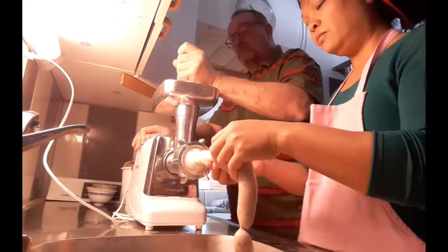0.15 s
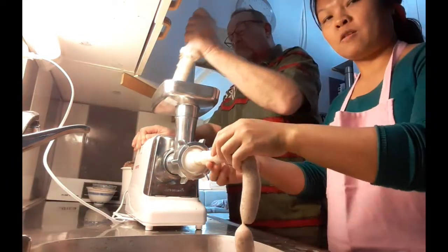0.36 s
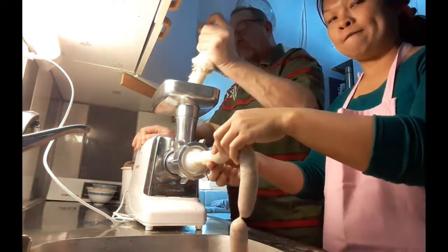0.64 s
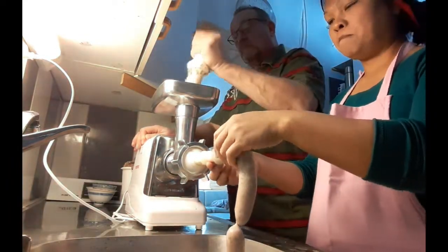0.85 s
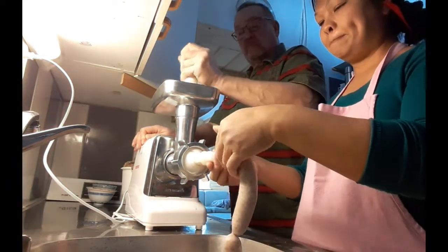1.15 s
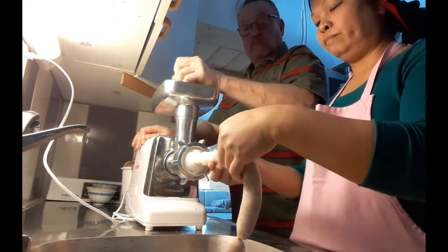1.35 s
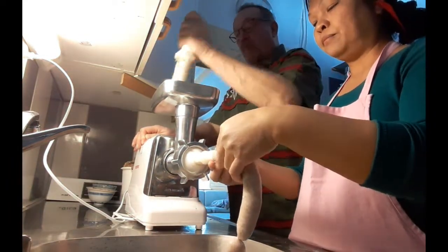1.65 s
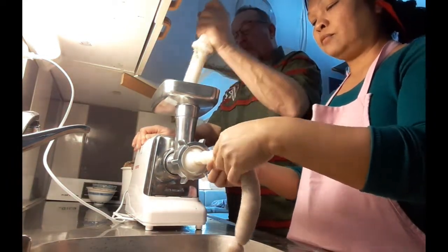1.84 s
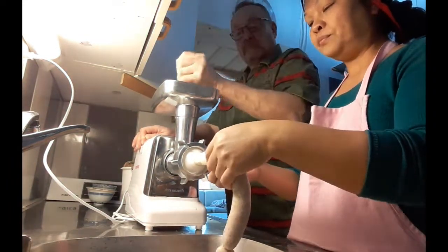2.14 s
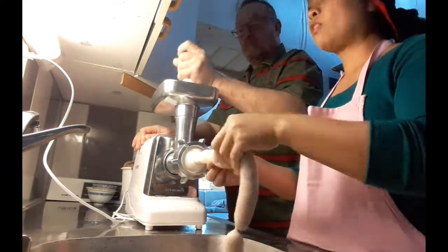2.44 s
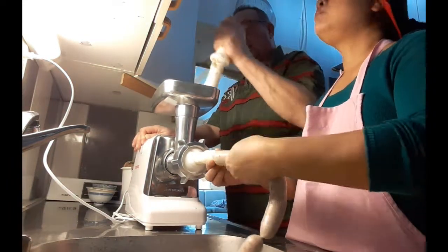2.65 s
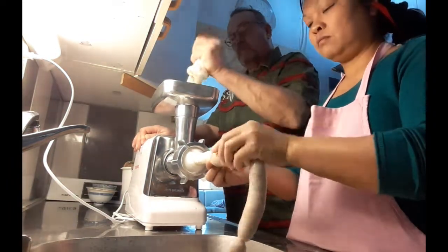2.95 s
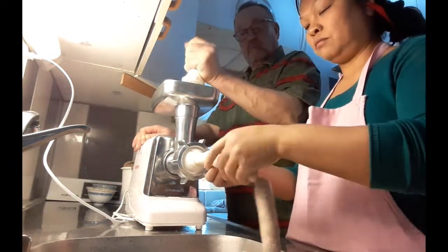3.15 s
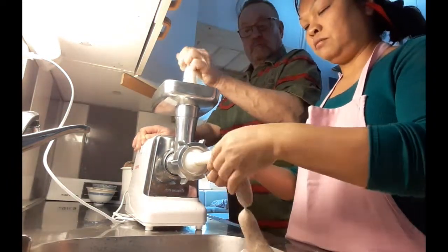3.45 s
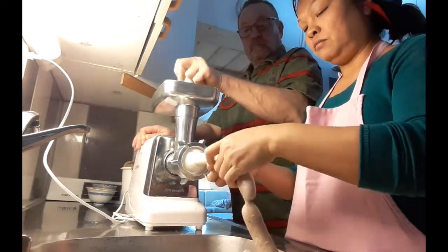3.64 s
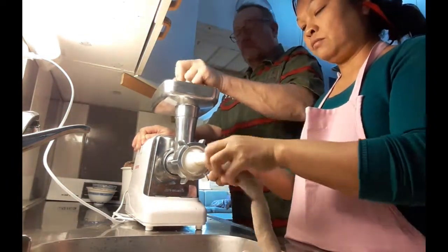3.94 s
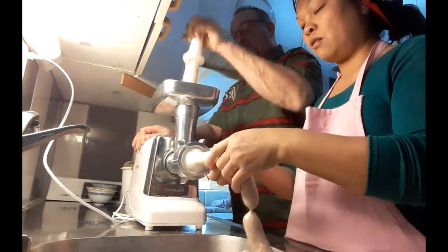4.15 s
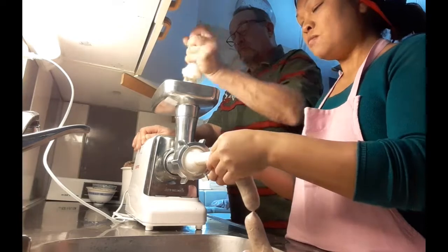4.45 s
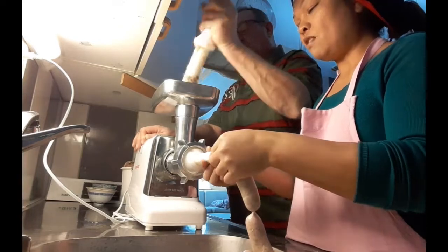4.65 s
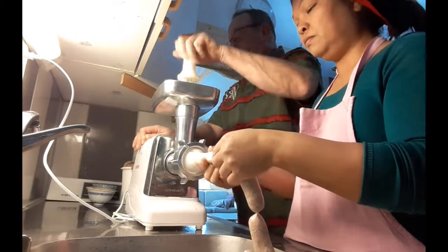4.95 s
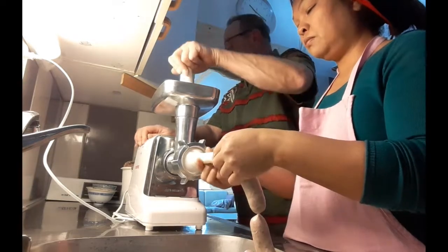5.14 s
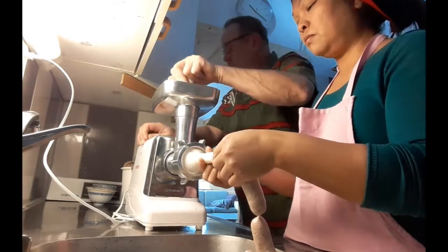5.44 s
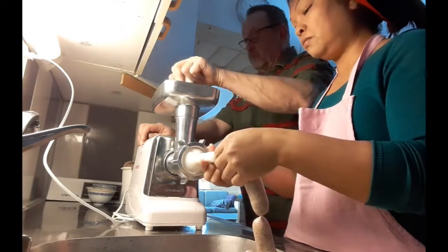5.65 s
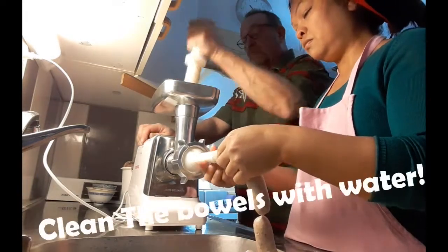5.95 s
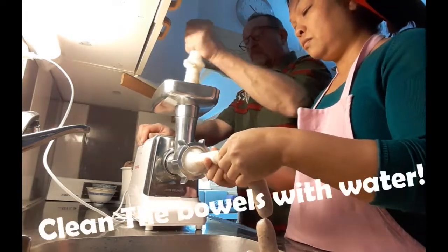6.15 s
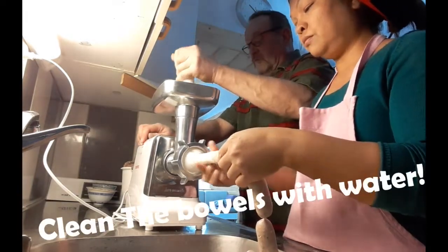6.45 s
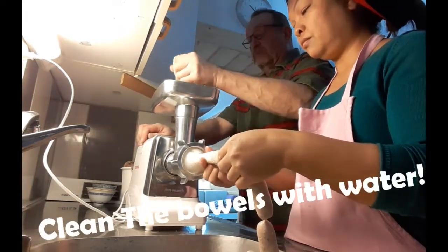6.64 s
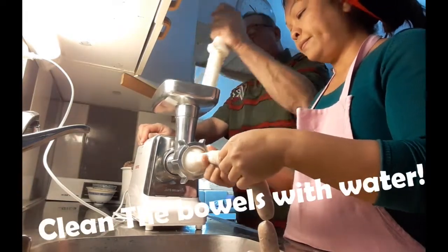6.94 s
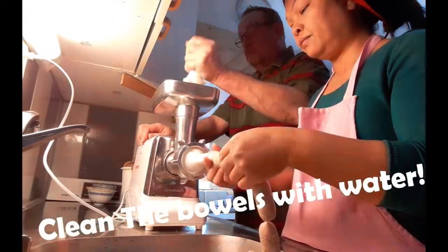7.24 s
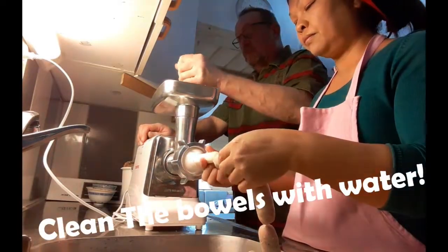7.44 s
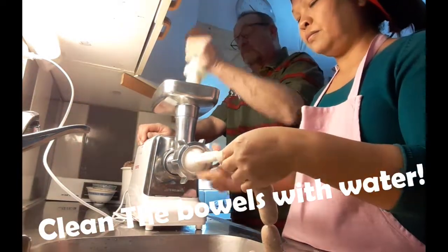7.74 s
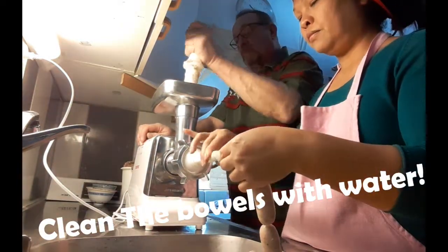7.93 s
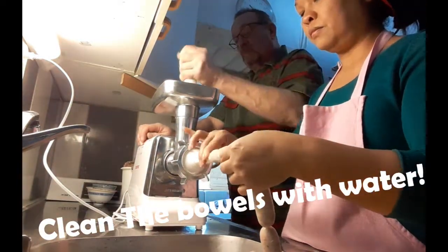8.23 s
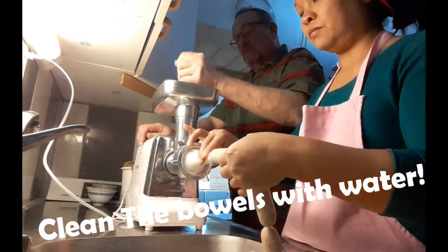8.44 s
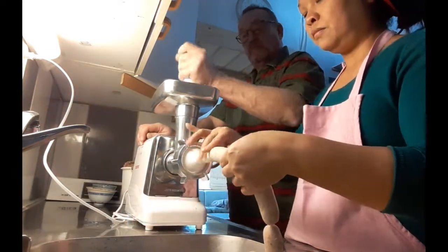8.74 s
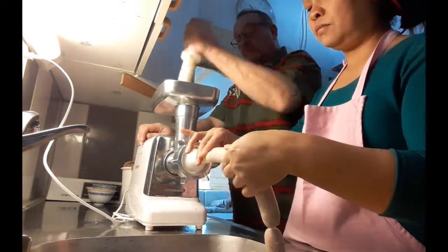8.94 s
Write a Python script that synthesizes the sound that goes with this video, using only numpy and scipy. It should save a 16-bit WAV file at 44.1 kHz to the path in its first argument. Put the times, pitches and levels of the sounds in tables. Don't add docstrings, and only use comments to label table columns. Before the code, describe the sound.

Steady mechanical whirring from a countertop mincer: stacked gear and motor tones, a rough housing rattle, mains buzz and broad hiss. Two small tray taps come early, then dull plunger bumps now and then. A lower singing whine fades midway; later the motor speeds up a hair. Close small microphone, little deep bass, hard kitchen surfaces, no start or stop.

```python
import sys
import numpy as np
from scipy import signal
from scipy.fft import rfft, irfft
from scipy.io import wavfile
from scipy.ndimage import map_coordinates

SR = 44100
rng = np.random.default_rng(int(sys.argv[2]) if len(sys.argv) > 2 else 0)


def materialize(psi):
    bounded = np.clip(np.atleast_2d(psi).T, -1, 1)
    quanta = np.round(bounded * 32767).astype(np.int16)
    wavfile.write(sys.argv[1], SR, quanta)


def linear_from_db(decibels):
    return 10 ** (np.asarray(decibels, float) / 20)


N = 400868

LAY_RATIO, MIDDLE_RATIO = 12.235, 3.5
PRESS_RELEASE_S = 0.14


def whines(turns, change_db):
    wobbles = [(12.235, .2, -.25), (6.1175, .08, -.19), (22.72, .17, .03), (26.4, .12, .04)]
    mesh_orders = [4.25, 8.5, 17, 21.25, 25.5, 34, 6.72, 13.44, 20.16, 40.32, 47, 5.43, 7.5, 9.38, 14.72,
                   24.4, 44.3, 49.7, 57.8]
    # rms level in dB, throb depth 0-1, throb phase in lay shaft turns.
    mesh = [(-77, 0.17, -0.13), (-63, 0.26, -0.53), (-55.5, 0.32, -.49), (-73, .3, .39), (-68.5, 0.5, 0.49),
            (-65, 0.15, .53), (-56, 0.22, -0.099), (-68, 0, 0), (-67.5, .2, -0.29), (-78.5, 0.6, -0.32),
            (-65, .14, -0.18), (-90, .1, .4), (-73.5, 0, 0.29), (-81.5, 0.3, 0.4), (-67, 0, .45),
            (-74, 0.2, .45), (-78, 0, .45), (-71, .3, 0.6), (-77.5, .2, .45)]
    rotor_orders = [6, 7, 8, 11, 12, 14, 15, 16, 18, 19, 23, 31, 32, 33, 35, 38, 39, 43, 46, 54, 55, 59, 62,
                    67, 75, 83, 94, 24, 28]
    # rms level in dB, throb depth 0-1, throb phase in lay shaft turns.
    rotor = [(-83, 0.1, 0.43), (-72, 0.14, -.23), (-59.5, 0.17, -0.055), (-83, .5, 0.39), (-76, 0.4, 0.23),
             (-71, 0, 0.46), (-59, 0, -.36), (-69.5, 0, .45), (-73, .26, 0.36), (-84.5, 0.3, .61),
             (-75.5, 0, -.44), (-66.5, 0.27, 0.37), (-73.5, 0, -.49), (-80.5, 0.7, -0.44),
             (-75, 0.5, -0.051), (-75.5, 0.06, -.42), (-68.5, .07, -0.0093), (-68.5, .2, .2),
             (-71, .14, .53), (-71, .05, 0.32), (-68.5, 0.1, 0.33), (-70.5, .06, -.02), (-72, .2, 0.018),
             (-70.5, 0.3, -.02), (-81.5, .3, 0.56), (-74.5, .07, .48), (-78, 1, .43), (-79.5, 0, 0.5),
             (-75.5, .2, 0.57)]

    lay = turns / LAY_RATIO
    swing = sum(share / 100 * ratio * np.sin(2 * np.pi * (turns / ratio + turn))
                for ratio, share, turn in wobbles)
    angle = turns + swing / (2 * np.pi) + 0.0028 * walk(18) + 0.0048 * walk(4)
    backlash = 0.24 * np.sin(2 * np.pi * (lay - 0.25))
    flutter = [walk(20) for _ in range(6)]
    slip = [0.18 * walk(9) for _ in range(5)]
    drift_db = 0.75 * walk(1.424)
    out = np.zeros(N)
    for k, (order, (db, depth, turn)) in enumerate(zip(mesh_orders + rotor_orders, mesh + rotor)):
        slow_db = change_db[order] if order in change_db else np.roll(drift_db, k * 30011)
        flutter_db = (0.45 + 0.025 * order) * flutter[k % 6]
        phase = 2 * np.pi * (order * angle + rng.random()) + slip[k % 5] + backlash * (order < 8.2)
        out += linear_from_db(db + slow_db + flutter_db) * throb(lay, depth, turn) * np.sin(phase)
    return np.sqrt(2) * out * throb(turns / MIDDLE_RATIO, 0.055, 0.22)


def responses(t, speed):
    # time in seconds, seating from -1 loose to 1 tight.
    seating = [(0, 0.68), (.2, 0.28), (.45, 0.2), (1, 0.63), (1.45, 0.88), (1.7, .1), (2.2, .75),
               (2.65, -0.18), (3.2, 0.66), (3.9, .55), (4.2, -0.58), (4.5, 0), (5.6, -.9), (6, 0.24),
               (6.4, -1), (7.3, 0.48), (7.9, 0.08), (8.4, -0.48)]
    led = (6.72, 15, 17, 25.5, 34, 47, 8, 8.5, 31, 46, 20.16, 33)
    # dB per turn/s of speed, dB per unit seating, offset in dB, wander in dB.
    answer = [(2.5, 0.5, -1.2, .8), (2.5, -1, -0.5, 1), (-2, -0.5, 0.73, 0.65), (-0.5, 1.7, -1.2, 2.7),
              (2, 3.5, -1, 1.5), (-0.5, 9.5, 0.5, .7), (-1, 0.2, 0, 0.7), (-2.5, 0.5, -0.8, 0.8),
              (-2, -1.1, 0, 1.1), (-5.5, 4, -1, 1.9), (2, 0, 0, 1.2), (4, -1.5, -1.5, 0.5)]

    seat = np.interp(t, *np.transpose(seating))
    usual_speed = 113
    out = {}
    for order, (per_speed, per_seat, offset_db, wander_db) in zip(led, answer):
        out[order] = per_speed * (speed - usual_speed) + per_seat * seat + offset_db + wander_db * walk(4)

    tray_order, damped_db = 4.25, -16
    free = ramp(t, 0.21, 0.25) * (1 - ramp(t, 3.86, 1.3))
    singing_db = 7.5 - 1.04 * t
    out[tray_order] = damped_db + free * (singing_db - damped_db) + 1.1 * walk(5.1)
    out[tray_order] -= 8 * pressure(t, PRESS_RELEASE_S)
    out[8.5] += 4 * pressure(t, 2.6 * PRESS_RELEASE_S)
    return out


def pressure(t, release_s):
    # peak time in seconds, force 0-1.
    presses = [
        (1.58, .8),
        (2.55, 0.8),
        (2.78, 0.3),
        (4.12, 0.7),
        (5.95, .6),
    ]
    attack_s = 0.08
    return sum(force * ramp(t, s - attack_s, attack_s) * np.exp(-np.maximum(t - s, 0) / release_s)
               for s, force in presses)


def rattle(turns):
    # frequency in Hz, width in Hz, rms level in dB, throb depth 0-1,
    # throb phase in lay shaft turns.
    body = [(589, 100, -77.5, 0.42, -0.0018), (782, 40, -66.5, 0.37, -0.013), (845, 25, -65.5, 0.089, 0.17),
            (943, 45, -70, .2, 0.26), (1220, 213, -65.5, .05, -.1), (1587, 87, -68.5, .05, .5),
            (1725, 82, -61, 0.072, 0.069), (1803, 100, -57, 0.065, -0.3), (1904, 60, -70.5, 0.37, .5),
            (2070, 120, -69.5, .2, 0.67), (2292, 154, -62, 0.072, 0.54), (2842, 150, -67.5, 0.1, 0.47),
            (3206, 360, -67, 0.068, .4), (3846, 250, -68, 0.062, 0.39), (4577, 300, -66.5, .05, 0.45),
            (5236, 460, -63, .05, 0.87), (6103, 240, -62, .02, .1), (6510, 220, -63.5, .02, .1),
            (7680, 230, -65, 0.13, 0.45), (8300, 570, -63, 0.27, 0.47), (8980, 490, -63.5, 0.18, .5),
            (10240, 160, -72, .03, .1), (11180, 1100, -66.5, 0.032, .1), (12250, 370, -71.5, .03, .1),
            (13500, 600, -73.5, .03, .1)]

    knocks = throb(turns, 0.15, 0.11) * throb(turns / 2, 0.087, 0.3)
    lay = turns / LAY_RATIO
    place = ((lay + 0.0004 * walk(6)) * 4096).astype(int) % 4096
    flaws = rng.standard_normal(4096)[place]
    repeat_share = 0.29
    out = np.zeros(N)
    for hz, width, db, depth, turn in body:
        fresh = rng.standard_normal(N)
        contact = knocks * (np.sqrt(repeat_share) * flaws + np.sqrt(1 - repeat_share) * fresh)
        out += linear_from_db(db + 0.55 * walk(2.46)) * throb(lay, depth, turn) * ring(contact, hz, width)
    return out


def hum(t):
    # start in seconds, hold in seconds, rise over idle buzz in dB.
    pushes = [(.6, 0.67, 2.5), (2, 0.37, 3), (2.75, .15, 5), (3.15, 0.15, 6), (3.4, .5, 1.5),
              (4.498, 0.11, 3.5), (5.86, 0.28, 6.5), (6.35, 0.28, 8), (6.95, 0.18, 6), (7.85, .3, 3),
              (8.9, .2, 2)]

    attack_s, release_s = 0.044, 0.3
    push_db = np.max([db * ramp(t, s - attack_s, attack_s) * (1 - ramp(t, s + hold, release_s))
                      for s, hold, db in pushes], axis=0)
    level_db = -78 + push_db - 3 * pressure(t, PRESS_RELEASE_S) + 1.7 * walk(22)
    buzz = linear_from_db(level_db) * np.sin(2 * np.pi * 300.5 * t)
    drone = linear_from_db(-114) * np.sin(2 * np.pi * SR / 1024 * t)
    return np.sqrt(2) * (buzz + drone)


def thuds():
    # time in seconds, peak level in dB, frequency in Hz.
    chute_blows = [(0.163, -72, 285), (0.554, -84, 180), (2.036, -81, 240), (2.319, -86, 256),
                   (3.026, -78, 280), (4.101, -89, 234), (4.875, -79, 280), (5.812, -81, 230),
                   (6.222, -89, 221), (6.713, -83, 245), (7.505, -83, 253), (7.838, -86, 256),
                   (8.164, -83, 280), (8.72, -79, 280)]
    # time in seconds, peak level in dB, frequency in Hz.
    more_knocks = [
        (.234, -69, 483),
        (.55, -72, 496),
        (1.0, -85, 240),
        (2.24, -82, 260),
        (4.55, -88, 200),
    ]

    out, t = np.zeros(N + 2000), np.arange(2000) / SR
    blow = (t / 0.0064) ** 3 * np.exp(3 - t / 0.0023)
    squelches = rng.random((350, 3)) * [N / SR, 12, 220] + [0, -104, 160]
    for s, db, hz in [*chute_blows, *more_knocks, *squelches]:
        i = int(s * SR)
        tones = np.sin(2 * np.pi * hz * t)
        tones += 0.62 * np.sin(2 * np.pi * 1.5 * hz * t)
        tones += 0.3 * np.sin(2 * np.pi * 3 * hz * t)
        out[i:i + 2000] += linear_from_db(db + 6.5) * blow * tones
    return signal.sosfilt(signal.butter(3, 150, "high", fs=SR, output="sos"), out[:N])


def air(turns):
    # frequency in Hz, relative level in dB.
    spectrum = [(30, -50), (70, -56), (110, -46), (200, -22), (400, -12), (600, -9.5), (1000, -1.5),
                (2200, -3.5), (3000, 2.5), (5500, 1.5), (7400, 2), (9800, -5), (13000, -4), (15700, -4.5)]

    hz, db = np.transpose(spectrum)
    pulsed = rng.standard_normal(N) * throb(turns, 0.065, 0.34)
    hiss = shape(pulsed, lambda f: np.interp(np.log(f), np.log(hz), db))
    return linear_from_db(-53.5 + 0.35 * walk(2.9)) * hiss / np.std(hiss)


def throb(shaft_turns, depth, turn):
    angle = 2 * np.pi * (shaft_turns + turn)
    return 1 + depth * (np.cos(angle) - 0.32 * np.sin(2 * angle))


def ring(x, hz, width):
    b, a = signal.iirpeak(hz, hz / width / 1.5, fs=SR)
    y = signal.lfilter(b, a, signal.lfilter(b, a, x))
    return y / np.std(y)


def walk(rate):
    count = int(N / SR * rate) + 4
    return 1.07 * map_coordinates(rng.standard_normal(count), [np.arange(N) * rate / SR], order=3)


def shape(x, db_at):
    return irfft(rfft(x) * linear_from_db(db_at(np.arange(N // 2 + 1) * SR / N + 1)), N)


def ramp(t, start, length):
    return np.clip((t - start) / length, 0, 1)


def scene():
    # time in seconds, speed in turns per second.
    motor_speed = [(0.0, 113.57), (0.2, 113.1), (0.95, 113.4), (1.1, 112.81), (1.75, 112.35), (2.25, 112.8),
                   (2.45, 112.33), (2.95, 112.37), (3.6, 112.9), (4.15, 112.4), (5.0, 112.41),
                   (5.35, 113.1), (5.93, 112.09), (6.1, 112.44), (6.85, 113.17), (7.4, 114.41),
                   (7.75, 113.79), (9.09, 113.76)]
    # frequency in Hz, width in Hz, depth in dB.
    dips = [(703, 20, -1), (1001, 49, 5), (1174, 23, 9), (1400, 25, 4), (1603, 15, 1), (1937, 17, 6.5),
            (2196, 19, 9), (3050, 89, 5), (6300, 88, 5.5), (7505, 86, 5.5)]

    t = np.arange(N) / SR
    speed = np.interp(t, *np.transpose(motor_speed))
    turns = np.cumsum(speed) / SR
    noise = shape(rattle(turns) + air(turns),
                  lambda f: -sum(db / (1 + ((f - hz) / width) ** 4) for hz, width, db in dips))
    mono = whines(turns, responses(t, speed)) + noise + hum(t) + thuds()
    return np.array([mono, mono])


def low_pass(x):
    return signal.sosfilt(signal.butter(12, 16300, fs=SR, output="sos"), x)


def record(dry):
    split_times = [.175, .222, .384, .825, 1.058, 1.29, 1.847, 1.893, 2.01, 2.033, 2.056, 2.381, 2.613,
                   2.822, 3.542, 3.914, 4.842, 5.168, 5.214, 5.307, 5.4, 5.83, 6.259, 6.793, 7.072, 7.141,
                   7.582, 7.698, 7.768, 8.74]

    mono = shape(dry[0], lambda f: -120.0 * (f > 15740))
    size = 1536
    side, f = np.zeros(N), np.arange(size // 2 + 1) * SR / size
    low_hz, high_hz, width_hz = 4600, 14400, 1600
    for s, (first, second, chance) in zip(split_times, rng.random((len(split_times), 3))):
        i = int(s * SR) - size // 2
        count = 1 + (chance < 0.65)
        places = np.array([first, (first + 0.3 + 0.4 * second) % 1])[:count]
        start_hz = low_hz + (high_hz - low_hz) * places[:, None]
        inside = np.any((f > start_hz) & (f < start_hz + width_hz), axis=0)
        band = rfft(mono[i:i + size]) * inside
        band = band * np.exp(2j * np.pi * rng.random(len(f)))
        side[i:i + size] += linear_from_db(-2.0) * irfft(band) * signal.windows.tukey(size, 0.9)
    return low_pass(mono + np.array([side, -side]))


dry = scene()
out = record(dry)
materialize(out)
```